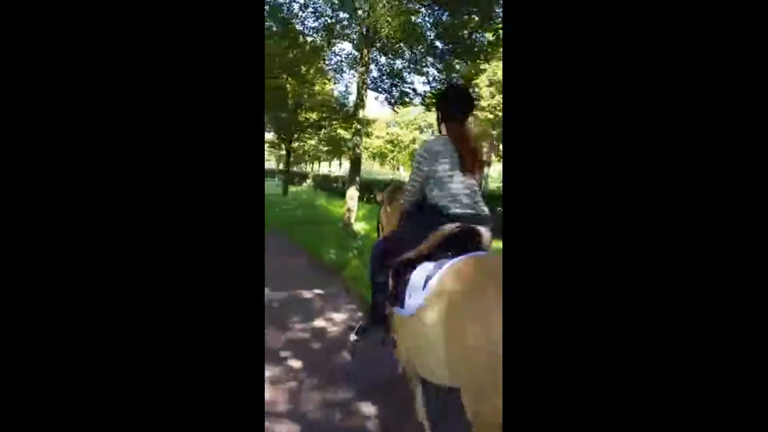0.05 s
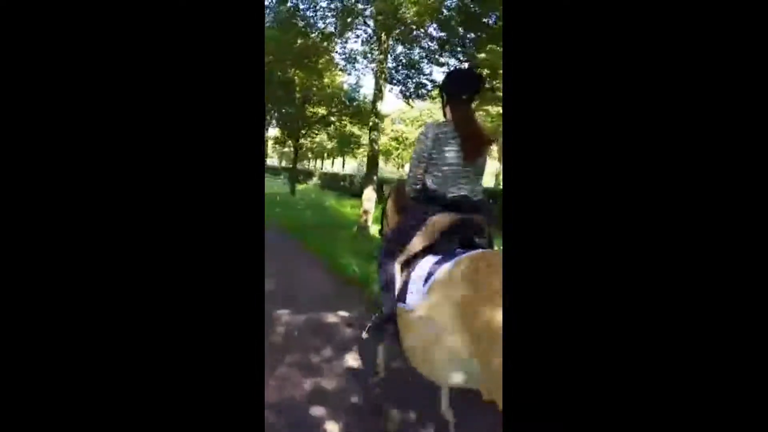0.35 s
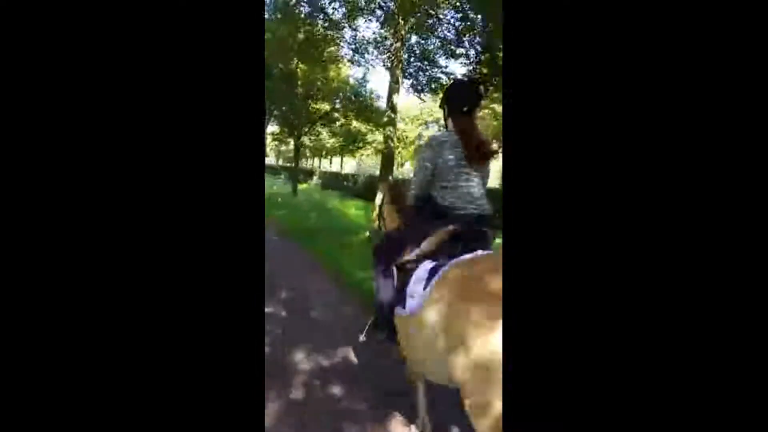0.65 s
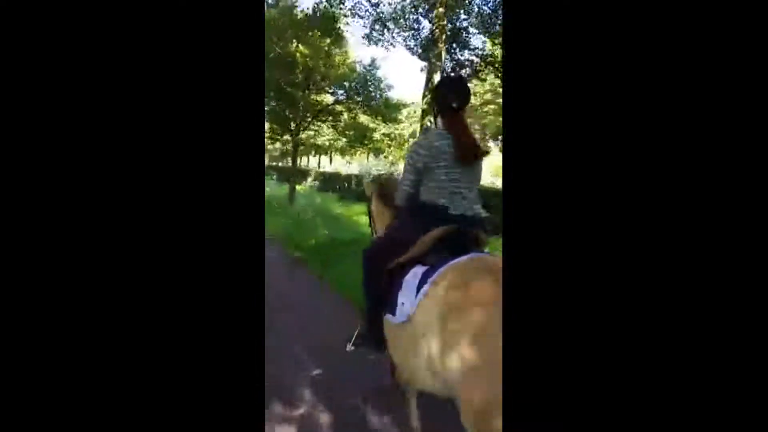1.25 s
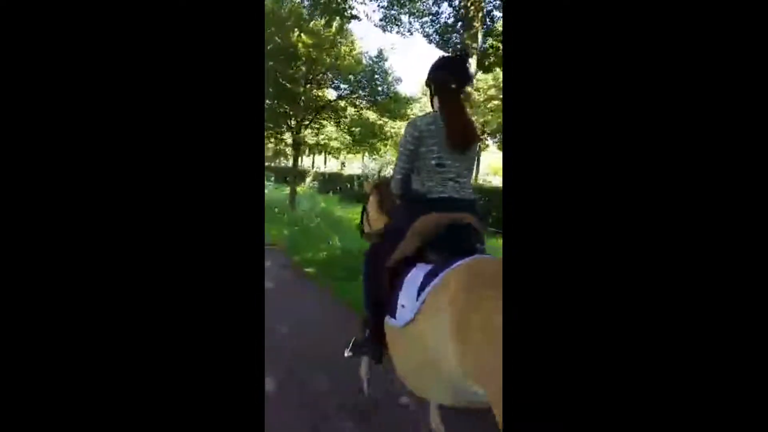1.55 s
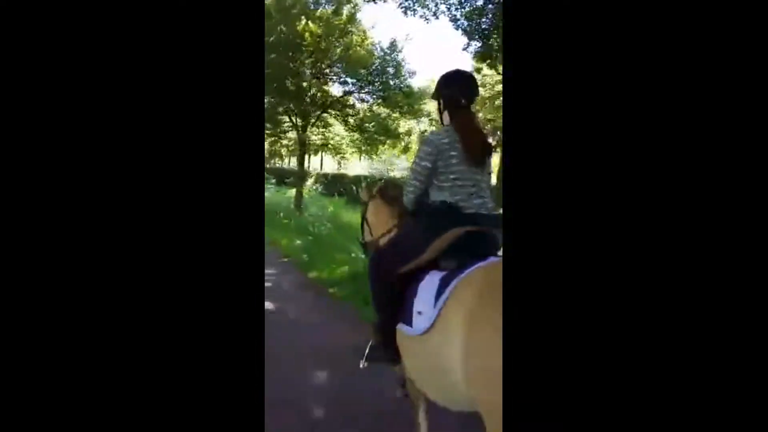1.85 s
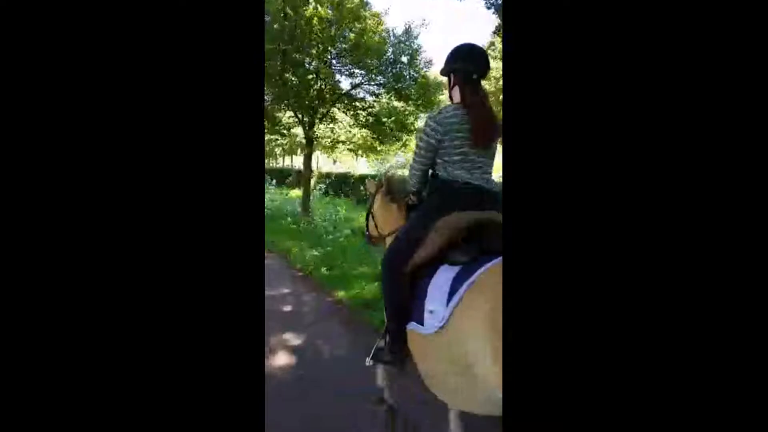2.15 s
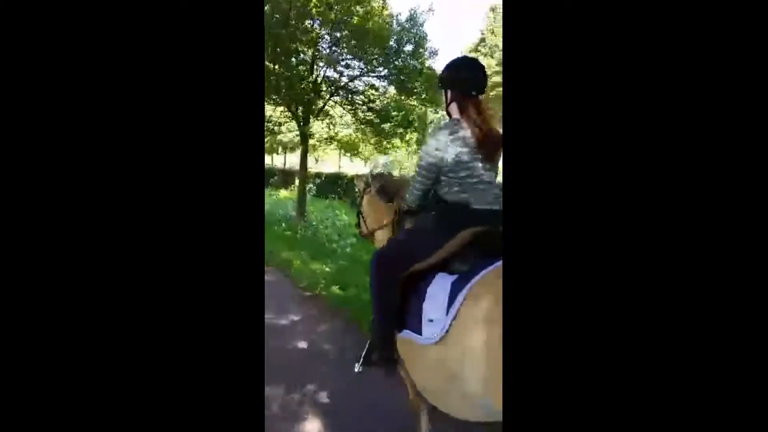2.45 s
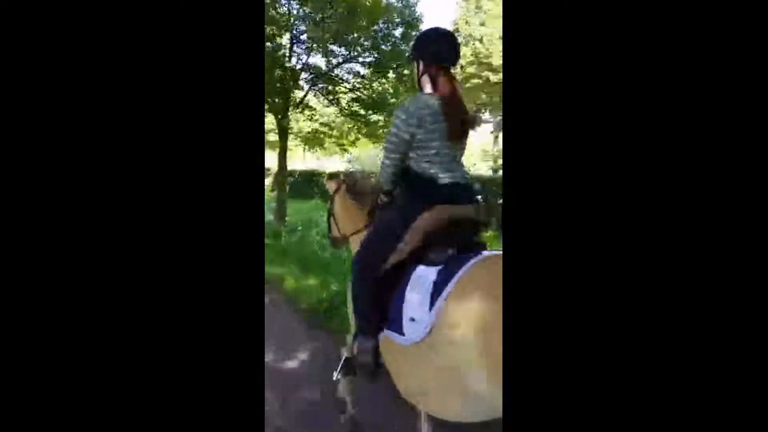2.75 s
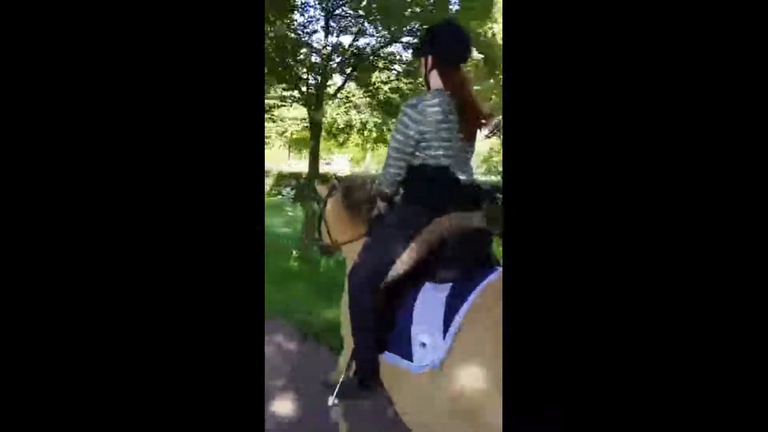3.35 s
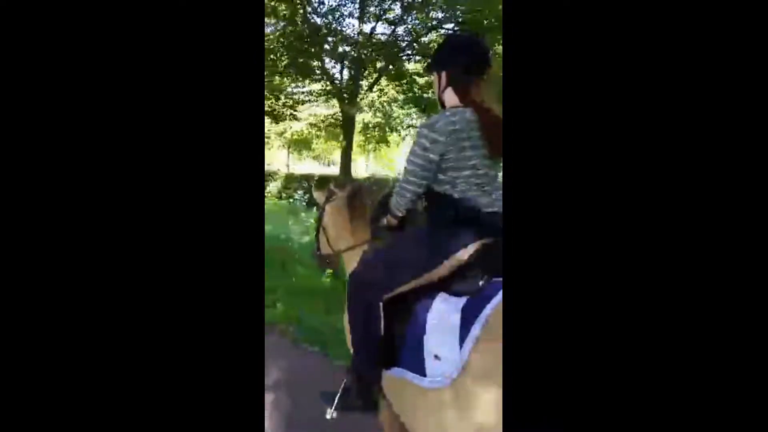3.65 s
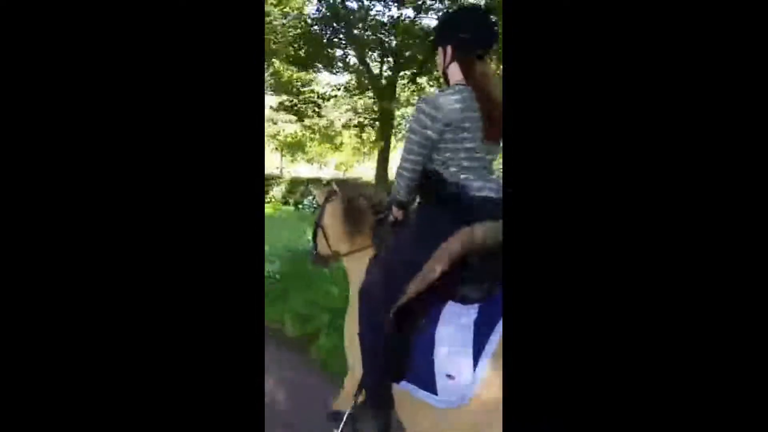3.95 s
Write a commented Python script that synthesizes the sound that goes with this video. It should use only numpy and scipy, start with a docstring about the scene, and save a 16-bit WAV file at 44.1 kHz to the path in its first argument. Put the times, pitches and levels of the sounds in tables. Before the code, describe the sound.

Close, even clip-clop of a trotting horse on paving, over gusty wind rumble.

```python
"""Trotting horse under trees

A horse trots on a paved path, heard close from a moving stereo microphone just behind it and to its left.
Each beat is a diagonal pair of hooves landing in a quick run of contacts: horn cracks on grit and the
hollow under the hoof rings. The trees scatter a bright tail and their leaves hiss. Moving air buffets the
left microphone port hard and the right one lightly. A faint, very high whistle passes near the end."""
import sys
import numpy as np
from scipy import signal
from scipy.fft import rfft, irfft, next_fast_len
from scipy.io import wavfile

SR = 44100
rng = np.random.default_rng(int(sys.argv[2]) if len(sys.argv) > 2 else 0)


def transcribe(u):
    """Save the signal u as a 16-bit wav file named by the first command-line argument.

    u: samples, shape (n,) or (channels, n), limited to [-1, 1]; the rate is SR.
    q: integer samples, one column per channel.
    """
    v = np.clip(np.atleast_2d(u).T, -1, 1)
    q = np.round(v * 32767).astype(np.int16)
    wavfile.write(sys.argv[1], SR, q)


N = 176400


def from_db(db):
    """Decibels to gain."""
    return 10 ** (np.asarray(db) / 20)


def unit_rms(x):
    """Scale to an rms of 1."""
    return x / np.sqrt(np.mean(x ** 2) + 1e-20)


def in_time(rows):
    """The columns of a curve at every sample."""
    times, *columns = np.transpose(rows)
    return [np.interp(np.arange(N) / SR, times, column) for column in columns]


def at_hz(points, hz):
    """Read a spectrum on a log-frequency axis."""
    points_hz, points_db = np.transpose(points)
    return np.interp(np.log(hz + 1), np.log(points_hz), points_db)


def decay(t, t60):
    """Exponential fall of 60 dB in t60 seconds."""
    return np.exp(-np.log(1000) * t / t60)


def coloured(x, db_of_hz):
    """Causal (minimum-phase) filter with the given response."""
    size = 2 * next_fast_len(x.shape[-1])
    gain = from_db(db_of_hz(np.fft.rfftfreq(size, 1 / SR)))
    cepstrum = irfft(np.log(gain + 1e-9))
    cepstrum[1:size // 2] *= 2
    cepstrum[size // 2 + 1:] = 0
    return irfft(rfft(x, size) * np.exp(rfft(cepstrum)))[..., :x.shape[-1]]


def drift(rate_hz):
    """Random wander with a spread of 1, mostly slower than rate_hz."""
    hz = np.fft.rfftfreq(N, 1 / SR)
    spectrum = rfft(rng.standard_normal(N)) / (1 + (hz / rate_hz) ** 2) * (hz > 0)
    return unit_rms(irfft(spectrum, N))


# Horn on grit, heard close. Each row: frequency in Hz, relative level in dB.
CRACK_COLOUR = [(150, 20.5), (600, 9), (1500, 9), (2100, 5), (2650, -3), (3300, -0.5), (4500, -2),
                (6500, -1), (8400, -1.5), (10000, -6.5), (13500, -18.5), (16000, -30)]
CRACK_ATTACK_S, CRACK_T60_S, CLICK_DB = 0.000058, 0.0082, -8.5
GRIND_DB, GRIND_T60_S, GRIT_SPREAD_DB, GRIT_HZ = -10, 0.062, 4.5, 5450
HORN_DB, HORN_WIDTH_HZ, HORN_SCATTER_DB = 8.5, 270, 2.1


def crack(t, horn_hz):
    """Horn meets grit: a hard click, tiny fractures and a grinding tail, through the horn's resonance."""
    onset = t < .004
    grains = rng.standard_normal(len(t))
    grains *= from_db(GRIT_SPREAD_DB * np.minimum(rng.exponential(1, len(t)), 4))
    tail = decay(t, CRACK_T60_S) + from_db(GRIND_DB) * decay(t, GRIND_T60_S)
    fractures = grains * tail * (1 - np.exp(-t / CRACK_ATTACK_S))
    burst = fractures / np.linalg.norm(fractures[onset]) + from_db(CLICK_DB) * (t == 0)
    # each contact favours other resonances of the horn
    colour = [(hz, db + HORN_SCATTER_DB * rng.standard_normal()) for hz, db in CRACK_COLOUR]
    centre_hz = np.sqrt(horn_hz * GRIT_HZ)

    def response_db(hz):
        resonance_db = HORN_DB / (1 + ((hz - horn_hz) / HORN_WIDTH_HZ) ** 2)
        octaves_off = np.log2((hz + 1) / centre_hz)
        return at_hz(colour, hz) + resonance_db - 10 * np.log10(1 + octaves_off ** 2)

    burst = coloured(burst, response_db)
    return burst / np.std(burst[onset])


# Modes of the hollow under a hoof. Each row: multiple of the ring pitch, signed strength, t60 in seconds.
HOOF_MODES = [(0.884, 0.8, 0.024), (1.117, -1.004, 0.017), (1.3, -0.035, 0.14), (2.15, -0.033, 0.014),
              (3.25, -0.063, 0.0082)]
RING_DELAY_S, MODE_SCATTER = 0.00017, 0.064


def ring(t, pitch_hz):
    """The hollow clop: two strong, close modes swell and cancel within a few cycles."""
    t = np.maximum(t - RING_DELAY_S, 0)
    clop = 0
    for ratio, strength, t60 in HOOF_MODES:
        hz = pitch_hz * ratio * (1 + MODE_SCATTER * rng.standard_normal())
        clop += strength * np.sin(2 * np.pi * hz * t) * decay(t, t60)
    return clop


# Hooves on the paving, just ahead and to the right. Each row: start in seconds, relative crack level
# in dB, horn resonance in Hz, relative ring level in dB, ring pitch in Hz.
HOOF_CONTACTS = [(0.0003, -24, 6830, -10.5, 954), (0.2836, -22.5, 4300, -18.5, 1100),
                 (0.2914, -19, 7600, -19.5, 1150), (0.2999, -28, 8750, -19, 1130),
                 (0.31, -15, 6000, -11, 906), (0.5583, -28, 6450, -32, 1130),
                 (0.59, -16.5, 7500, -32, 1110), (0.5948, -18.5, 4070, -3.5, 1060),
                 (0.6033, -25, 5200, -18, 1110), (0.612, -17.5, 3360, -12, 1040),
                 (0.827, -34, 8500, -40, 1130), (0.902, -18, 8400, -19, 1070),
                 (0.9109, -19, 3060, -12, 1130), (0.9211, -19, 3400, 0.5, 983),
                 (1.1926, -22, 4570, -40, 1330), (1.1996, -9.5, 4600, -9, 1155),
                 (1.2047, -43, 4800, -5.5, 1160), (1.2158, -28, 5400, -15, 1070),
                 (1.5069, -16, 8900, -11.5, 1110), (1.514, -16.5, 8300, -9, 1110),
                 (1.5199, -19, 5200, -32, 1160), (1.5261, -17.5, 2360, -5.5, 963),
                 (1.756, -31.5, 7940, -31, 1080), (1.805, -22, 7600, -39, 1240),
                 (1.8089, -16, 7100, -21, 1100), (1.8131, -13, 3480, -3.5, 1070),
                 (1.8265, -17, 7360, -9, 956), (2.1142, -23.5, 8600, -30, 1190),
                 (2.1193, -14.5, 8950, -21, 1080), (2.1365, -14, 3330, -1, 990),
                 (2.392, -21, 6640, -14, 1120), (2.401, -28, 8100, -43, 1040),
                 (2.4187, -14, 8500, -22, 1050), (2.4223, -17, 3200, 1, 1070),
                 (2.4379, -14.5, 7060, -4.5, 955), (2.726, -24.5, 8600, -33, 1030),
                 (2.732, -23.5, 5200, -28, 1150), (2.7402, -21, 6500, -24, 1210),
                 (2.7484, -19.5, 3160, -20, 1200), (3.03, -14.5, 5060, -19.5, 980),
                 (3.0345, -26, 4500, -7, 1030), (3.047, -18, 3400, -5.5, 934),
                 (3.336, -15, 5730, -20, 1150), (3.346, -20, 3280, -12.5, 1300),
                 (3.3573, -20, 5670, -10.5, 1006), (3.636, -14.5, 6250, -18, 1040),
                 (3.6406, -31, 5400, -5, 990), (3.654, -17.5, 3320, -2.5, 1026),
                 (3.9472, -19, 5600, -11.5, 1190), (3.956, -16, 5200, -35, 1310),
                 (3.9673, -16, 7340, -3, 934)]


def hooves():
    """At every contact the horn cracks and the hollow rings."""
    out, t = np.zeros(N + SR), np.arange(SR // 10) / SR
    for start_s, crack_db, horn_hz, ring_db, ring_hz in HOOF_CONTACTS:
        start = int(start_s * SR)
        strike = from_db(crack_db) * crack(t, horn_hz) / np.sqrt(2)
        clop = from_db(ring_db + 1) * ring(t, ring_hz)
        out[start:start + len(t)] += strike + clop
    return out[:N]


TICK_DB, TICK_SPREAD_DB, TICK_RING_DB = -40, 3, 6.5
TICK_AFTER_S, TICK_SCATTER_S, TICK_ATTACK_S = 0.016, .055, 0.00094


def grit_ticks(per_contact):
    """Each contact stirs faint ticks of loose grit, scattered around it in time."""
    out, t = np.zeros(N + SR), np.arange(SR // 20) / SR
    attack = 1 - np.exp(-t / TICK_ATTACK_S)
    for contact_s in np.repeat([row[0] for row in HOOF_CONTACTS], per_contact):
        start = int((contact_s + TICK_AFTER_S + TICK_SCATTER_S * rng.standard_normal()) * SR)
        gain = from_db(TICK_DB + TICK_SPREAD_DB * min(rng.exponential(), 3))
        tick = crack(t, horn_hz=5860) * attack + from_db(TICK_RING_DB) * ring(t, pitch_hz=1102)
        if 0 <= start < N:
            out[start:start + len(t)] += gain * tick
    return out[:N]


# Shade on the left port, which faces away from the hooves. Each row: frequency in Hz, gain in dB.
LEFT_SHADOW = [(200, 3), (800, -7.5), (1200, -3), (2000, -5), (3300, -11.5), (5400, -20), (9000, -7.5),
               (14000, -3)]
LEFT_LAG_S = 0.00026


def at_ports(x):
    """The direct sound reaches the left port later and shaded."""
    shaded = coloured(x, lambda hz: at_hz(LEFT_SHADOW, hz))
    left = np.interp(np.arange(N) - LEFT_LAG_S * SR, np.arange(N), shaded)
    return np.array([left, x])


# What the trees along the path throw back. Each row: frequency in Hz, relative gain in dB.
TREE_COLOUR = [(200, -41), (600, -45), (1000, -7), (2000, -0.5), (3500, -0.5), (6000, 0.5), (9000, 4),
               (12000, 1), (14500, -12)]
NEAR_DB, NEAR_T60_S, TREES_DB, TREES_T60_S = -19, 0.1, -15, 0.22
ECHO_ONSET_S, ECHO_LEFT_DB = 0.032, -6


def reflections(x):
    """Quick echoes off the ground and the horse's body, then a bright scatter from trunks and leaves."""
    t = np.arange(SR) / SR
    near, far = rng.standard_normal((2, 2, SR)) * (1 - np.exp(-t / ECHO_ONSET_S))
    near = from_db(NEAR_DB) * unit_rms(near * decay(t, NEAR_T60_S))
    far = from_db(TREES_DB) * unit_rms(far * decay(t, TREES_T60_S))
    far = coloured(far, lambda hz: at_hz(TREE_COLOUR, hz))
    echoes = signal.fftconvolve(x[None], (near + far) / np.sqrt(SR), axes=1)[:, :N]
    return echoes * from_db([[ECHO_LEFT_DB], [0]])


BUFFET_DB, BUFFET_RATE_HZ, CORNER_SWING = 1.5, 53.4, 0.14
EDDY_SWING_DB, EDDY_RATE_HZ, EDDY_STEEPNESS, GUST_S = 2.07, 16.7, 1.232, 0.073


def wind(level_db, corner_hz, port_colour):
    """Eddies on a port: the spectrum falls ever faster above a corner; buffets are louder and brighter."""
    edges_hz = 20 * 2 ** np.arange(0, 8, .5)
    white = rng.standard_normal((2, N))
    buffet = np.clip(drift(BUFFET_RATE_HZ), -2, 2)
    corner_now = corner_hz * np.exp(CORNER_SWING * buffet)
    eddies = 0
    for k, (low, high) in enumerate(zip(edges_hz, edges_hz[1:])):
        hz = np.sqrt(low * high)
        band = signal.sosfilt(signal.butter(4, [low, high], "band", fs=SR, output="sos"), white[k % 2])
        # each size of eddy comes and goes on its own
        band_db = at_hz(port_colour, hz) + EDDY_SWING_DB * drift(EDDY_RATE_HZ)
        eddies += band * from_db(band_db) * np.exp(-(hz / corner_now) ** EDDY_STEEPNESS)
    flutter = from_db(BUFFET_DB * buffet) * eddies
    # averaged over about GUST_S, the flutter holds the gust's level
    window = np.hanning(int(2 * GUST_S * SR))
    power = signal.fftconvolve(flutter ** 2, window / window.sum(), "same")
    return from_db(level_db) * flutter / np.sqrt(power + 1e-12)


# Gusts right on the left port. Each row: time in seconds, relative level in dB, eddy corner in Hz.
LEFT_GUSTS = [(0.0, -14, 111), (0.07, -25.5, 104), (0.18, -19.5, 131), (0.36, -28.5, 131), (0.44, -21, 154),
              (0.53, -14.5, 123), (0.62, -15, 170), (0.69, -12.5, 164), (0.78, -18, 127),
              (0.87, -12.5, 169), (0.94, -21.5, 183), (1.01, -12, 274), (1.09, -7.5, 172),
              (1.17, -10.5, 244), (1.26, -9.5, 185), (1.43, -10.5, 231), (1.52, -10, 160), (1.63, -10, 235),
              (1.76, -4.5, 205), (1.805, -15, 149), (1.84, -8.5, 173), (2.08, -4, 160), (2.14, -13.5, 211),
              (2.23, -7, 240), (2.29, -13.5, 193), (2.31, -16, 141), (2.355, -17.5, 140),
              (2.38, -17.5, 191), (2.51, -11.5, 243), (2.56, -8, 220), (2.665, -6.5, 260), (2.735, -9, 710),
              (2.81, -11.5, 544), (2.85, -15, 380), (2.9, -13, 520), (2.96, -8.5, 280), (2.985, -29, 182),
              (3.06, -13.5, 234), (3.09, -22.5, 190), (3.125, -12, 470), (3.23, -12.5, 263),
              (3.34, -12.5, 580), (3.43, -17, 242), (3.61, -10.5, 496), (3.65, -18.5, 340),
              (3.73, -10.5, 454), (3.85, -17, 354), (3.9, -7, 430), (3.99, -14.5, 457)]
# What that port makes of the eddies. Each row: frequency in Hz, relative gain in dB.
LEFT_PORT = [(22, -25), (45, -12), (70, -2), (115, 2.5), (170, 0.5), (450, -0.5), (800, 1), (1600, -1.5)]


def exposed_wind():
    """Moving air hits the left port hard."""
    gust_db, corner_hz = in_time(LEFT_GUSTS)
    return wind(gust_db - 4, corner_hz, LEFT_PORT)


# Gusts on the microphone's sheltered side. Each row: time in seconds, relative level in dB.
RIGHT_GUSTS = [(0.0, -38), (0.64, -27.5), (1.13, -33.5), (1.41, -31.5), (1.68, -34.5), (1.79, -18.5),
               (2.03, -24.5), (2.19, -34), (2.62, -34), (2.76, -29), (3.73, -28.5), (3.99, -31)]
# What the right port makes of the eddies. Each row: frequency in Hz, relative gain in dB.
RIGHT_PORT = [(22, -1), (45, 6.5), (80, 0.5), (160, -4.5), (300, 3), (600, -3.5)]


def sheltered_wind():
    """Moving air rumbles lightly on the right port."""
    gust_db, = in_time(RIGHT_GUSTS)
    return wind(gust_db - 3, corner_hz=160, port_colour=RIGHT_PORT)


# Leaves overhead and the distance beyond. Each row: frequency in Hz, relative level in dB.
HISS_COLOUR = [(100, 11), (500, 11), (1000, 13), (1500, 10.5), (2200, 7.5), (4000, 7.5), (8400, 6.5),
               (10500, 2), (12800, -1), (14200, -14), (15500, -60)]
# Their slow rise and fall. Each row: time in seconds, level in dB relative to HISS_DB.
HISS_SWELL = [(0, -0.5), (.45, -1), (.8, 3), (1.4, 5), (2.0, 1.5), (2.3, 3), (2.9, -0.5), (4, 2.5)]
HISS_DB, HISS_LEFT_DB = -46, -5


def leaf_hiss():
    """Soft, wide hiss of the foliage, weaker on the left."""
    swell_db, = in_time(HISS_SWELL)
    noise = unit_rms(coloured(rng.standard_normal((2, N)), lambda hz: at_hz(HISS_COLOUR, hz)))
    return noise * from_db(HISS_DB + swell_db) * from_db([[HISS_LEFT_DB], [0]])


# Slaps of air on the left port. Each row: middle in seconds, level at the crest in dB, centre in Hz.
EDDY_THUDS = [(0.396, -17.5, 231), (0.647, -14.5, 118), (0.719, -14, 215), (0.748, -16, 275),
              (0.857, -9.5, 177), (1.163, -14.5, 280), (1.718, -3.5, 208), (2.395, -10, 214),
              (3.47, -11.5, 268)]
THUD_WIDTH_S, THUD_OCTAVES = 0.0068, 0.67


def eddy_thuds():
    """Single eddies slap the port: a few cycles of dull noise that swell and are gone."""
    out, t = np.zeros(N + SR), np.arange(SR // 10) / SR
    swell = np.exp(-((t - t.mean()) / THUD_WIDTH_S) ** 2)
    swell_rms = np.sqrt(np.mean(swell ** 2))
    for middle_s, db, centre_hz in EDDY_THUDS:
        noise = coloured(rng.standard_normal(len(t)),
                         lambda hz: -20 * np.log10(1 + (np.log2((hz + 1) / centre_hz) / THUD_OCTAVES) ** 4))
        start = int((middle_s - t.mean()) * SR)
        out[start:start + len(t)] += from_db(db) * swell_rms * unit_rms(noise * swell)
    return out[:N]


# A thin whistle, the same at both ports. Each row: time in seconds, pitch in Hz, level in dB.
WHISTLE_CURVE = [(3.2, 12500, -95), (3.26, 12700, -71), (3.38, 12800, -66), (3.44, 12680, -56),
                 (3.59, 12700, -75), (3.66, 12400, -95)]
WAVER_HZ, FLICKER_RATE_HZ = 70, 80


def whistle():
    """A faint, very high tone that wavers, flickers, swells and fades."""
    pitch_hz, db = in_time(WHISTLE_CURVE)
    phase = 2 * np.pi * np.cumsum(pitch_hz + WAVER_HZ * drift(FLICKER_RATE_HZ)) / SR
    return np.sqrt(2) * from_db(db) * drift(FLICKER_RATE_HZ) * np.sin(phase)


def scene():
    """At the microphone: close hooves and their echoes, leaves, a faint whistle, wind on both ports."""
    steps = hooves()
    port_wind = np.array([exposed_wind() + eddy_thuds(), sheltered_wind()])
    direct = at_ports(steps + grit_ticks(per_contact=2))
    return direct + reflections(steps) + leaf_hiss() + whistle() + port_wind


def record(dry):
    """The highest peaks are rounded and the top of the treble is cut."""
    ceiling, stopband_hz = .95, 16324
    rounded = dry / (1 + (dry / ceiling) ** 6) ** (1 / 6)
    return signal.sosfilt(signal.cheby2(12, 60, stopband_hz, fs=SR, output="sos"), rounded)


dry = scene()
out = record(dry)
transcribe(out)
```